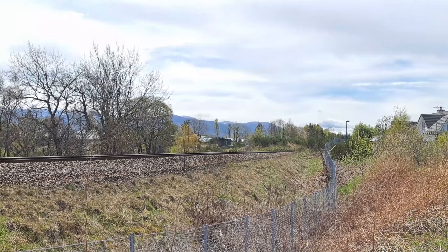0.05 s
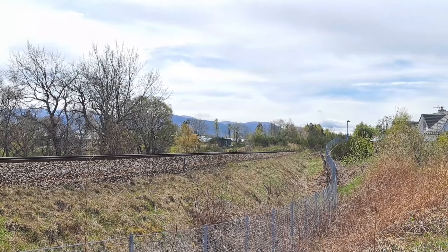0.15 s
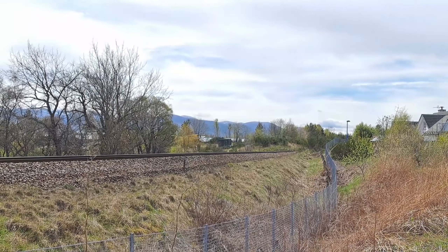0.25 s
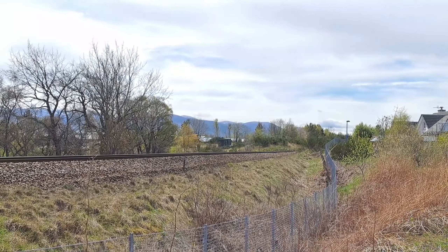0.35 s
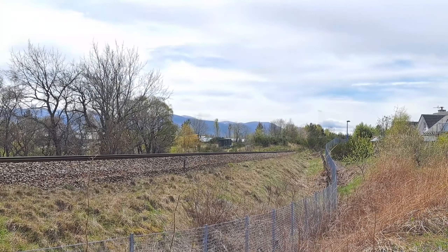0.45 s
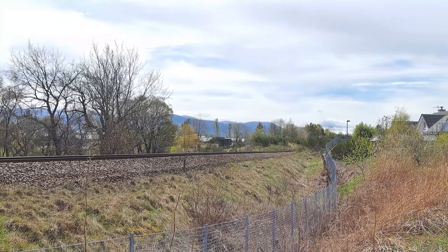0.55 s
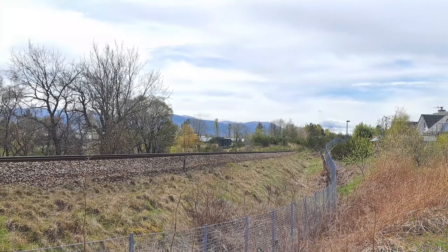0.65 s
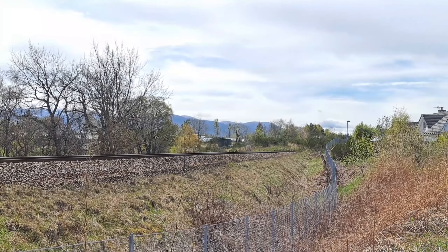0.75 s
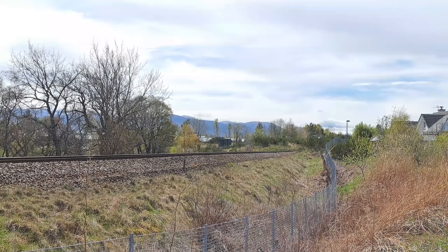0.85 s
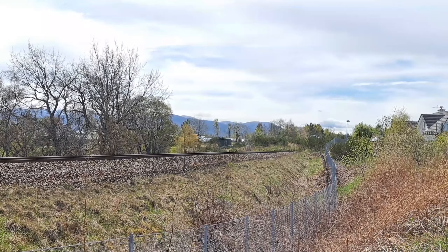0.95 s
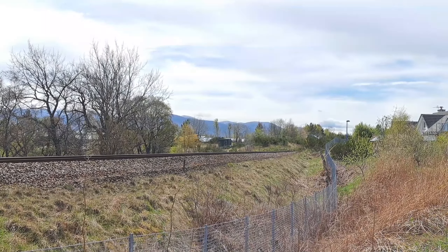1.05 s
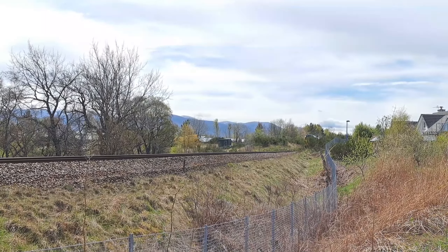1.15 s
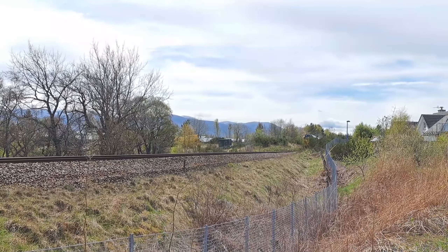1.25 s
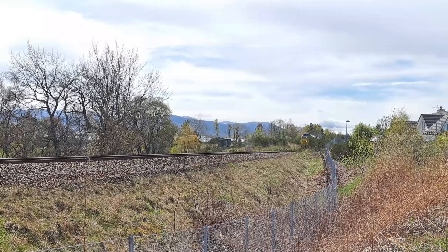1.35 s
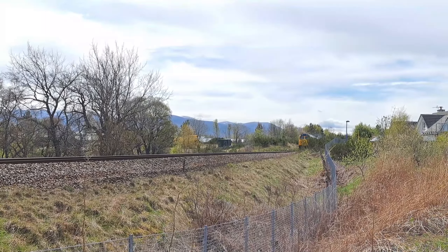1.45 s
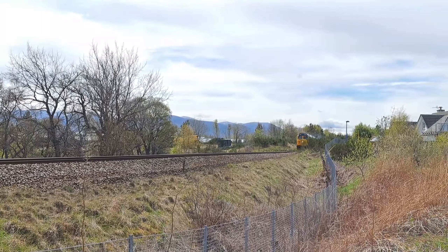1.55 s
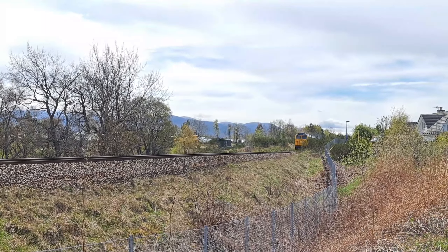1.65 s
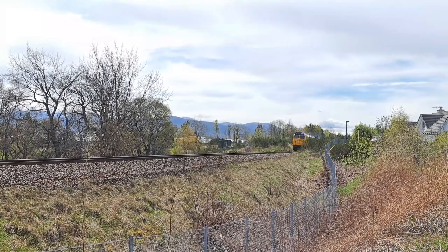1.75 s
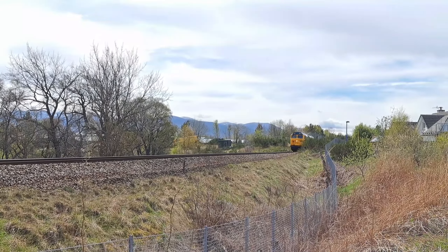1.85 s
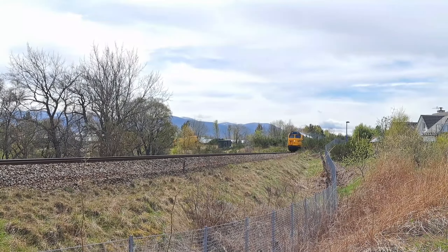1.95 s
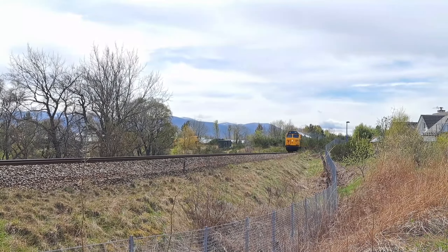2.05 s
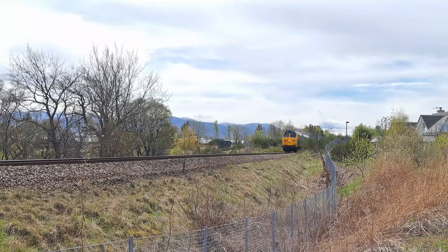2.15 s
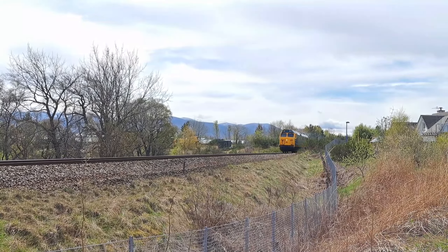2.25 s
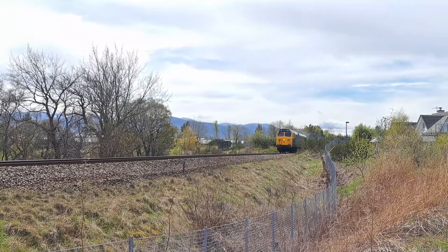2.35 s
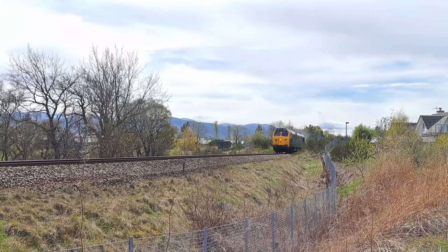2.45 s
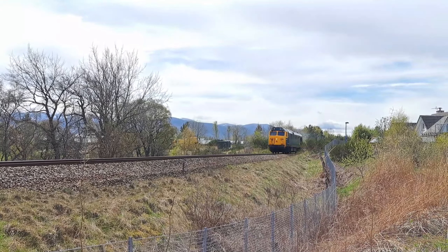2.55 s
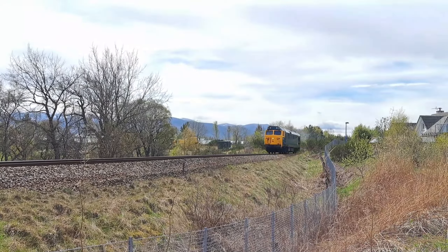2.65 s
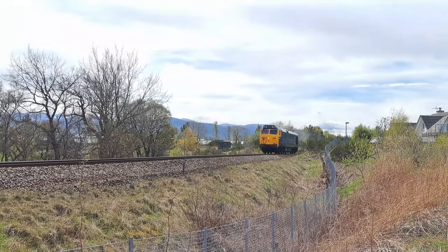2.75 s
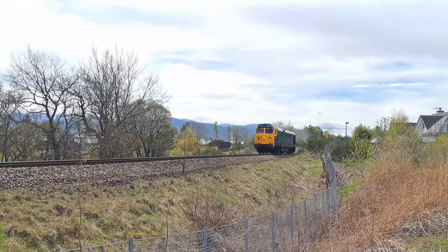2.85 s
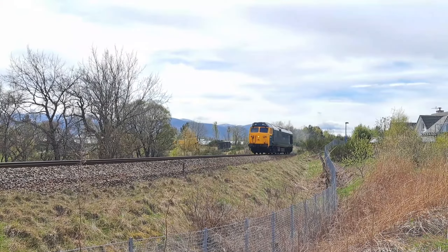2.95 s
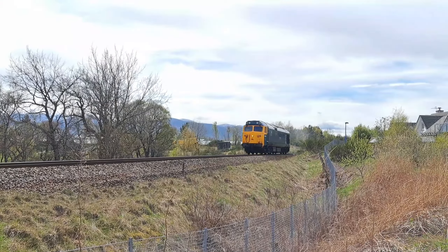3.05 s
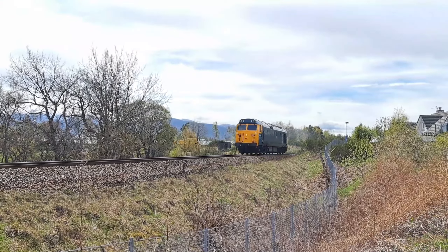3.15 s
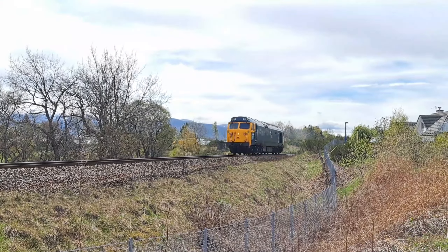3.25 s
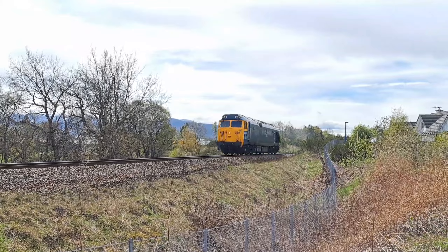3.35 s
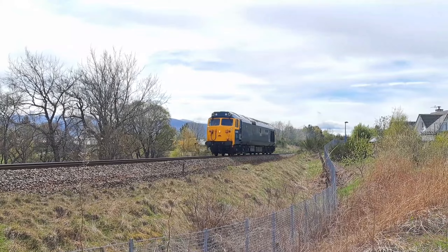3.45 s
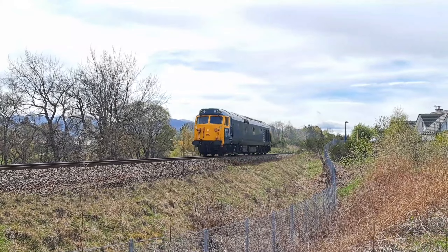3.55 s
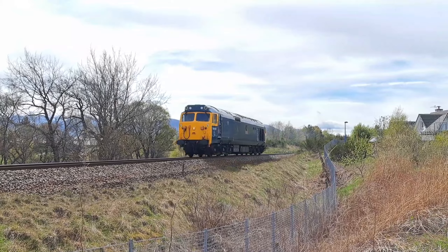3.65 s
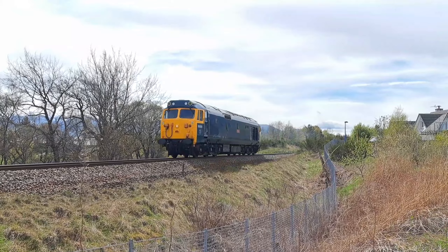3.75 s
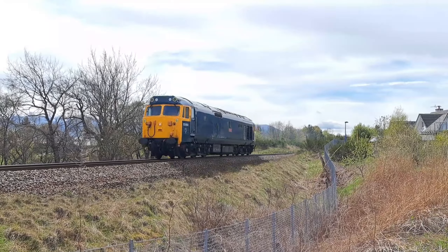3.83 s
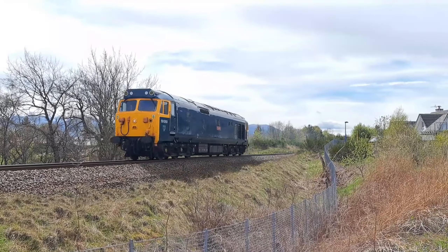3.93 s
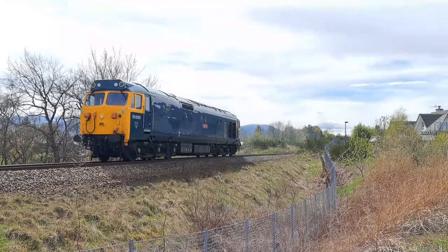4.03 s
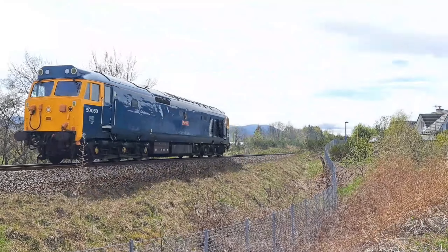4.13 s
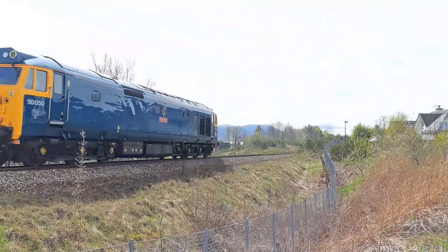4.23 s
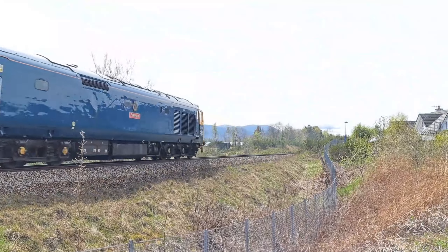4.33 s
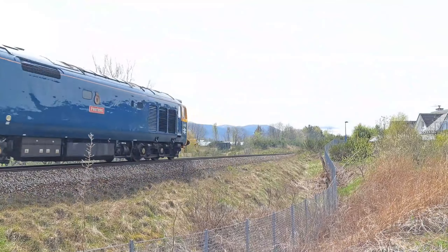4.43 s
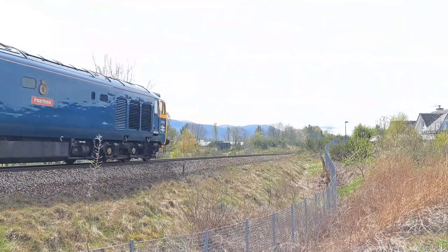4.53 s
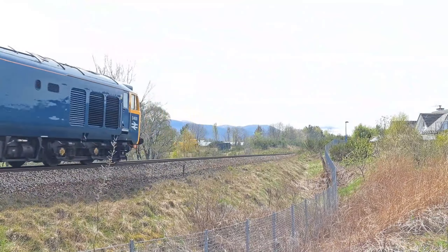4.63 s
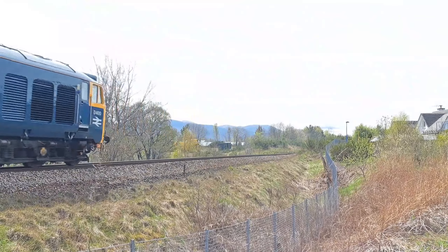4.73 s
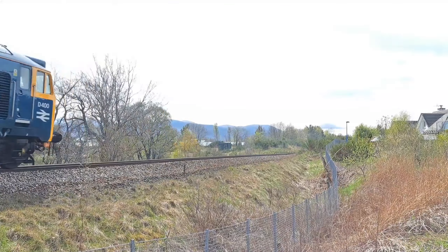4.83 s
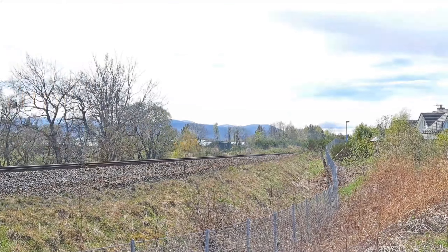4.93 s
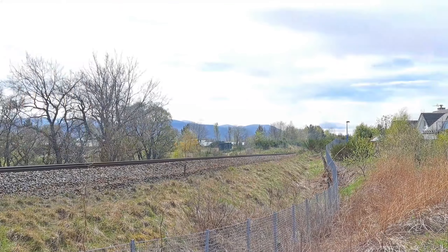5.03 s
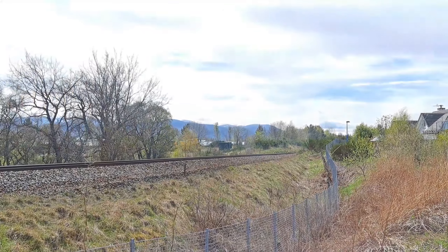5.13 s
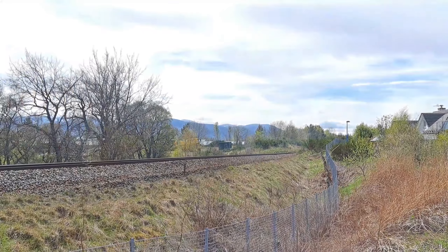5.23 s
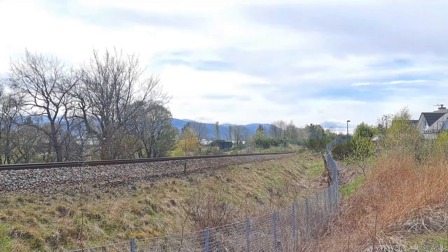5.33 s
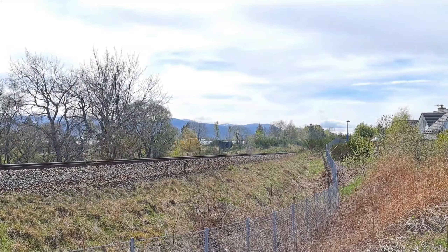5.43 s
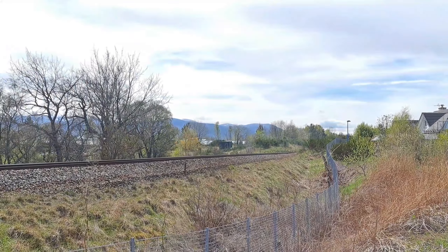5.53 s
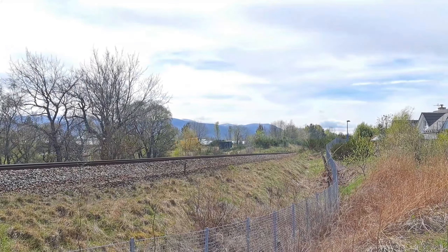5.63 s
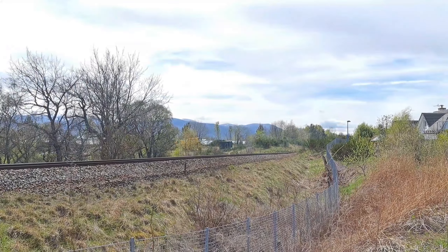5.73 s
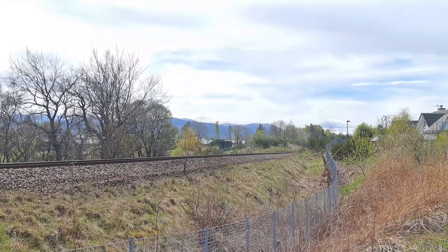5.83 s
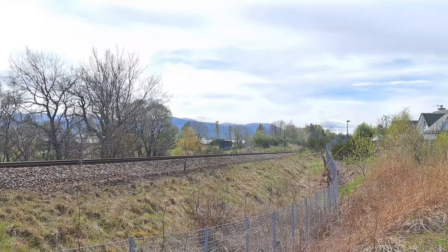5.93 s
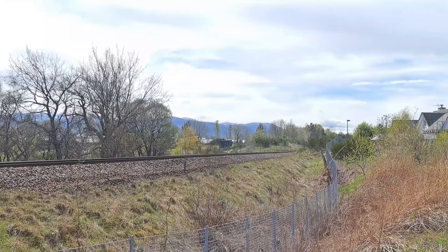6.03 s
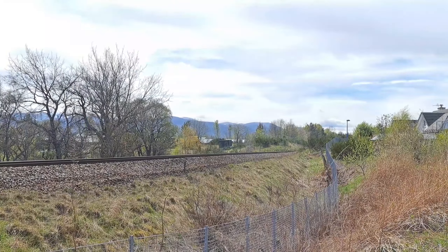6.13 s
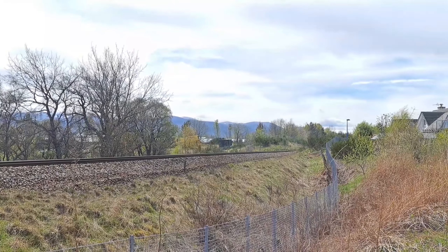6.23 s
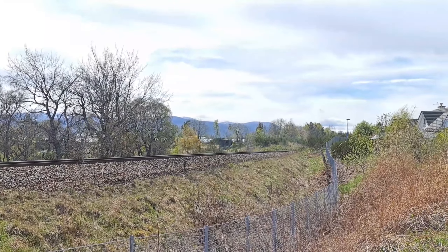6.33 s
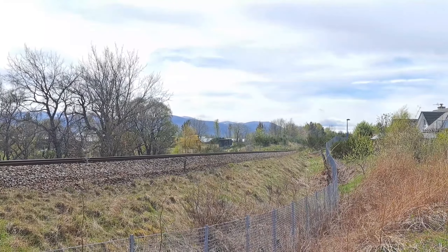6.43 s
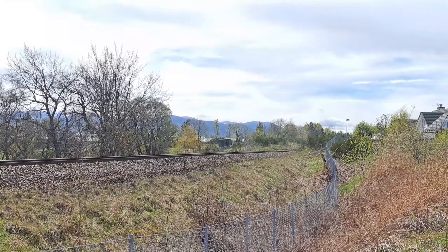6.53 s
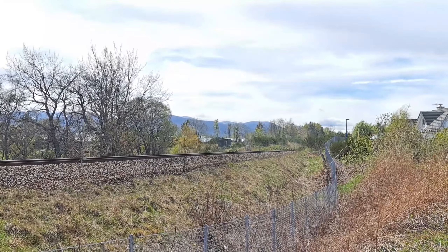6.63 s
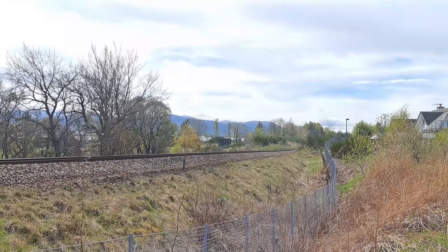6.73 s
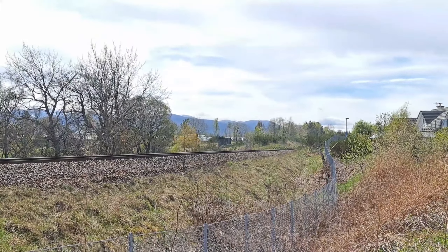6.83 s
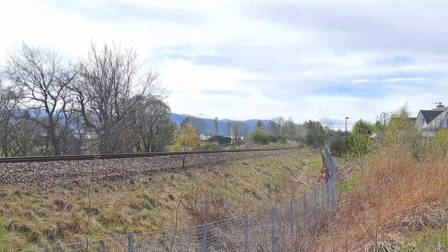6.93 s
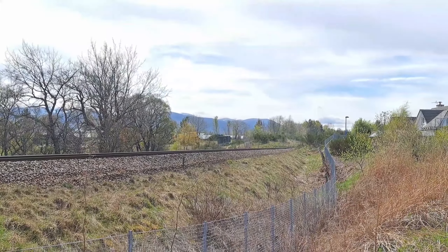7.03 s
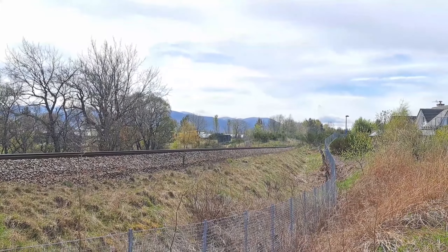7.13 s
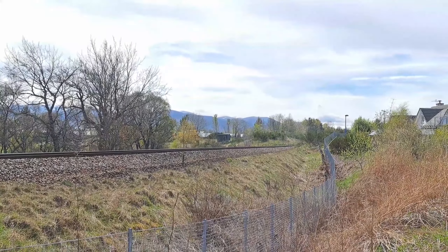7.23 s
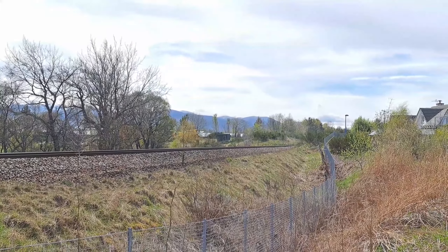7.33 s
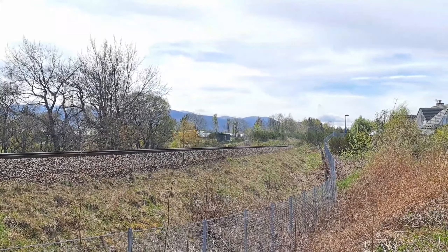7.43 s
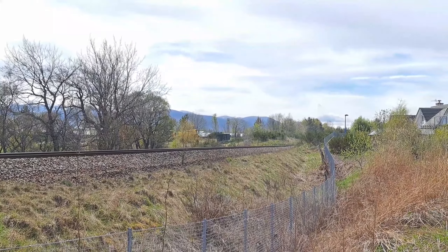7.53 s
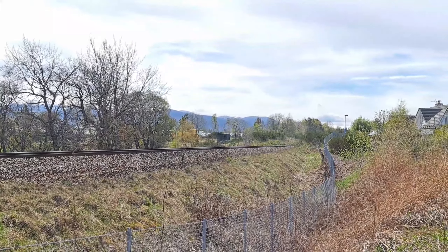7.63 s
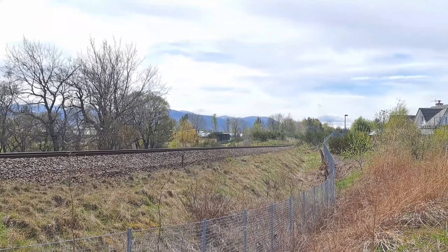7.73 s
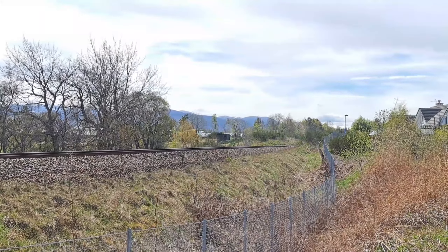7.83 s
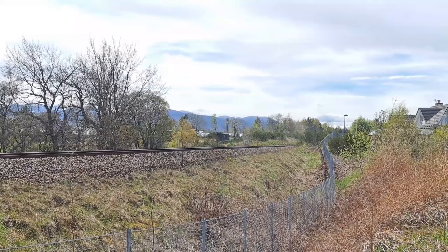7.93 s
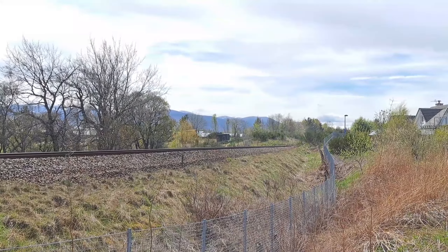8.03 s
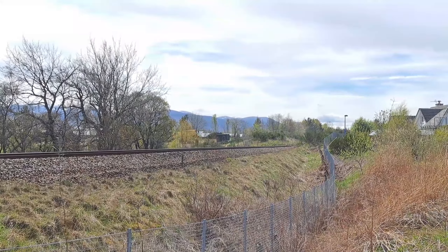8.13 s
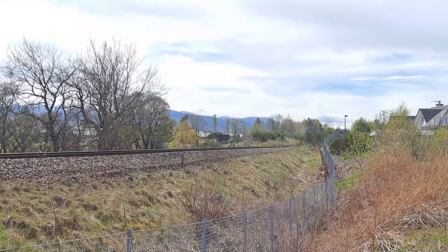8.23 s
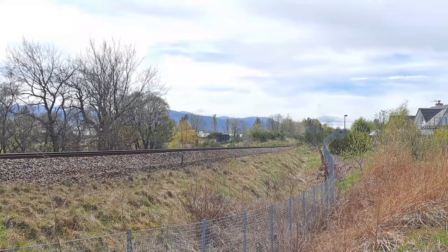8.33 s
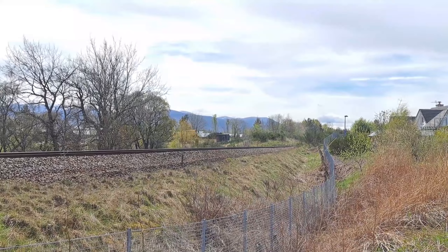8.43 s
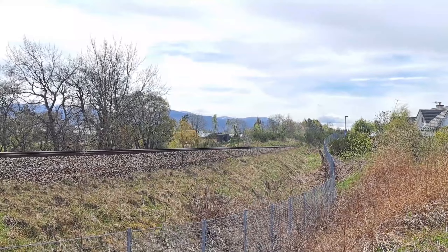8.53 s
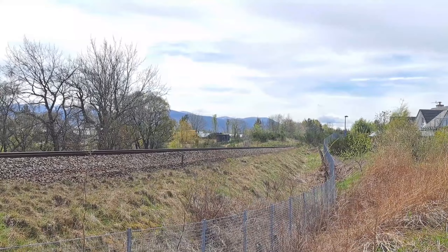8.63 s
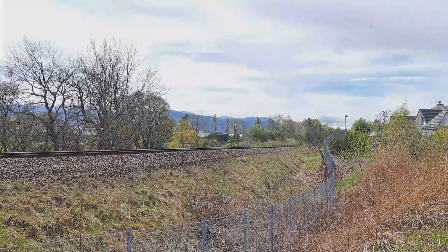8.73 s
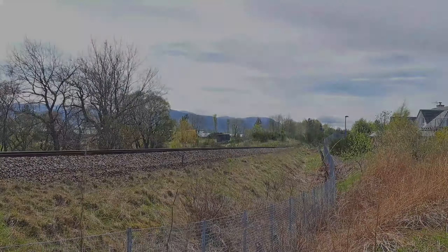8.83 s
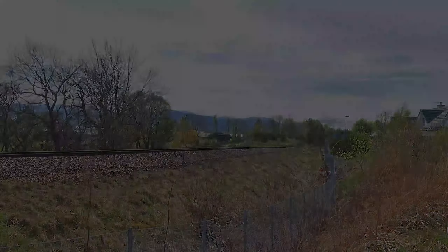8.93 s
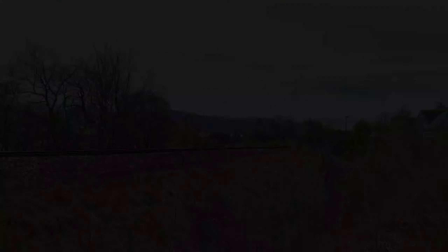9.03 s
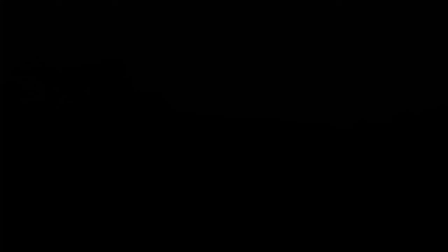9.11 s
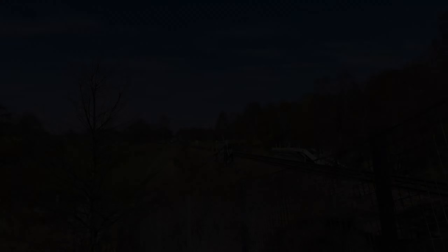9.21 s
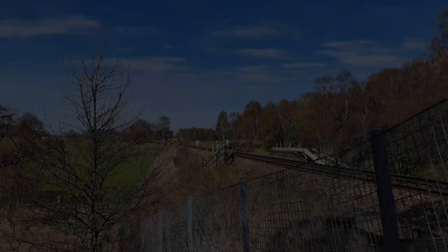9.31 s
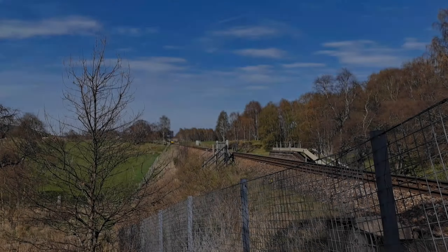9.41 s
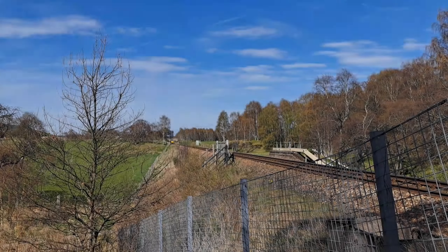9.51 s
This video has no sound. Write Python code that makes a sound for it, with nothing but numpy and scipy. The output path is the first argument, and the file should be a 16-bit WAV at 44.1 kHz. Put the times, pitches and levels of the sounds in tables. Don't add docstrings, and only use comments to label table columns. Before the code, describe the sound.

Open field beside a railway, handheld stereo phone. From 0 to 1 s, low wind puffs buffet mainly the left side over a distant, uneven diesel throb, easing as the engine throttles down. From 2 s wheel and gear roar builds, with scattered air spits from 2.25 s. Around 3.2-3.5 s short high flange squeals and brake grinding appear on the right. The locomotive passes at 4-5.3 s: loud deep throb, body rumble, broad roar, chopped exhaust, dense sharp air bursts and a breathy turbo whistle sliding downward. Pitch drops; by 6.5 s it is duller and receding. Rails ring thinly while gusts thump, strongest near 8.0-8.1 s, and continue to 9.1 s, with tiny bird notes at 9.0. Everything cuts to near silence; from 9.35 s a different spot fades in with wind, rustle, faint cricket and a rising bird note at 9.55.

```python
import sys
import numpy as np
from scipy import signal
from scipy.fft import rfft, irfft, next_fast_len
from scipy.io import wavfile
from scipy.ndimage import uniform_filter1d, map_coordinates

SR = 44100
rng = np.random.default_rng(int(sys.argv[2]) if len(sys.argv) > 2 else 0)


def nominal_scale(level):
    x = np.asarray(level, float) / 20
    return 10 ** x


def put_to_file(sound):
    columns = np.atleast_2d(sound).T
    safe = np.clip(columns, -1, 1)
    whole_steps = np.round(safe * 32767)
    wavfile.write(sys.argv[1], SR, whole_steps.astype(np.int16))


N = 422017
T = np.arange(N) / SR
SIZE = next_fast_len(N)
HZ = np.maximum(np.fft.rfftfreq(SIZE, 1 / SR), 1)

# (time [s], engine cycle as heard from ahead [Hz])
ENGINE_CYCLE = [(0, 6.36), (1.5, 5.75), (2.3, 5.49), (3, 5.38), (4, 5.31), (9.2, 5.2)]
# (multiple of the cycle, level [dB])
FIRING_ORDERS = [(5, -18), (7, -10), (9, 0), (11, -1), (12, -10), (13, -6), (14, -11), (16, -9), (18, -16),
                 (20, -12), (23, -17), (27, -19)]
COMPRESSOR_HZ = 46.8
# (time [s], pitch [Hz], level [dB])
TURBO = [(3.3, 9800, -95), (3.95, 9720, -56), (4.25, 9650, -53), (4.6, 9400, -49), (5.0, 8800, -48),
         (5.2, 8400, -49), (5.35, 8250, -54), (5.65, 8030, -56), (6.0, 7950, -59), (6.25, 7920, -63),
         (6.6, 7900, -95)]
# (time [s], peak [dB], top part against the peak [dB])
VALVE_SPITS = [(2.2532, -35.5, -25), (2.298, -34, -24.5), (2.324, -41, -25), (2.5475, -42, -25),
               (2.7611, -36, -24), (2.8045, -33, -23), (2.85, -33, -15), (3.0589, -40, -24),
               (3.1682, -33.5, -22), (3.7379, -44, -29), (3.8483, -29, -35), (3.9688, -33.5, -31),
               (4.185, -31, -23), (4.2308, -27.5, -18), (4.2717, -33, -20), (4.303, -25, -21.5),
               (4.349, -27, -17), (4.372, -23, -15), (4.491, -22, -13), (4.5396, -25, -8.5),
               (4.567, -29.5, -10), (4.613, -25.5, -7.5), (4.65, -31, -8), (4.736, -24.5, -8.5),
               (4.8099, -26.5, -7), (4.8409, -24.5, -5.5), (4.8603, -30, -9.5), (4.9162, -32.5, -5),
               (4.9631, -25.5, -13), (4.993, -29, -7), (5.0629, -29, -1), (5.0958, -34, -8),
               (5.1192, -32, -8), (5.1537, -21.5, -10), (5.2, -34, -9), (5.2759, -38, -2),
               (5.3328, -38, -17), (5.3707, -25, -24), (5.3966, -23, -21), (5.448, -26, -27),
               (5.4665, -33, -18), (5.5368, -40, -21), (5.5922, -31.5, -28), (5.635, -29, -29),
               (5.6919, -40, -32), (5.7094, -36, -32), (5.769, -27.5, -35), (5.816, -36, -28),
               (5.843, -37, -28), (5.9119, -33, -28), (5.94, -40, -26), (5.9923, -40, -24),
               (6.1625, -44, -33)]
# (time [s], length [s], pitch [Hz], level [dB])
SQUEALS = [(3.16, .13, 6040, -40), (3.28, .07, 6020, -42), (3.245, .045, 5210, -36),
           (3.245, .07, 4560, -34.5), (3.3, .035, 5180, -38), (3.34, .06, 4570, -35),
           (3.19, .05, 4560, -43), (3.36, .075, 5170, -42), (3.415, .06, 4570, -36),
           (3.51, .055, 5170, -40), (3.46, .07, 4540, -43), (5.71, .025, 2370, -35),
           (5.905, .025, 2230, -37), (5.93, .028, 2620, -39)]
# (time [s], half length [s], level [dB])
RUSTLES = [(7.098, 0.13, -67), (7.454, 0.16, -65), (8.693, 0.45, -75)]

# (pitch [Hz], width [Hz], level [dB])
RAIL_MODES_BEHIND = [(734, 57, 2), (1070, 80, -14), (1505, 115, 2.5), (1977, 190, -7), (2640, 38, -10),
                     (2940, 35, -8), (3400, 33, -11.5), (3900, 59, -5)]
RAIL_MODES_AHEAD = [(736, 50, 2.5), (834, 60, 10), (1422, 98, 6), (1940, 130, -6), (2610, 100, -25.5),
                    (4010, 300, -6.5)]
# (time [s], level [dB])
RAILS_BEHIND = [(5.0, -75), (6.2, -52), (6.9, -53), (7.08, -43), (7.8, -45), (8.1, -52), (8.3, -51),
                (8.5, -56), (8.75, -48), (9.1, -48)]

# (abreast [s], level there [dB],
# distance there [m], drop per tenfold distance ahead [dB], same behind [dB])
THROB_PASS = (5, -19, 10.5, 13, 11)
BODY_PASS = (4.5, -19.5, 11.5, 22, 35)
REAR_BODY_PASS = (5.17, -22, 5, 22, 60)
ROAR_PASS = (4.5, -20.5, 20, 17, 24)
GEAR_PASS = (4.5, -26, 19, 17, 32.5)
REAR_GEAR_PASS = (5, -25, 12, 32.5, 41.5)
GRIND_PASS = (3.32, -39, 4, 36, 22)
EXHAUST_PASS = (5, -34, 19.5, 36.5, 48.5)
HISS_PASS = (5.0, -48.5, 7, 17.5, 24)
RAILS_AHEAD_PASS = (4, -35, 24.5, 14.5, 128.5)
RAILS_HIGH_PASS = (8, -59.5, 31, 87, 22)
SPEED_M_S, ENGINE_ABREAST_S, TRACK_M = 26, 5.1, 14.5
# (time [s], level [dB])
AIR_CARRY = [(0, 0.5), (.8, -1), (2.3, -0.5), (2.9, 3), (3.1, 2), (3.4, 2), (4.1, 1.5), (5.2, -2),
             (5.65, -4.5), (6.33, -9.5), (6.6, -6.5), (7.05, 0.5), (7.75, 2), (8.1, -0.5), (8.3, -3),
             (8.5, -3), (8.8, 0), (9.1, -2)]
# (time [s], share of roar heard from behind [0-1])
BEHIND_SHARE = [(0, 0.01), (4.55, 0.05), (4.75, 0.9), (6.3, 0.88), (6.9, 0.85)]

# (pitch [Hz], level [dB per Hz])
THROB = [(20, -29.5), (32, -17), (50, 1), (75, -5), (100, -24)]
BODY = [(60, -29), (90, -12.5), (130, 1.5), (170, -6), (250, -7.5), (330, -10.5), (500, -24)]
ROAR = [(330, -18.5), (450, -8.5), (600, -3), (830, 0.5), (950, -4.5), (1200, -4), (1500, -14)]
ROAR_BEHIND = [(260, -9.5), (380, -8), (480, -1), (600, -1), (800, -4), (1000, -5), (1250, -21.5)]
GEARS = [(1000, -12), (1250, -5), (1550, 0), (1900, -2.5), (2600, -6.5), (3300, -7.5), (4200, -12.5),
         (5200, -19), (6500, -38.5)]
GRIND = [(1800, -14), (2600, -1), (4500, 2.5), (6200, -5), (8000, -15), (11000, -20.5)]
EXHAUST = [(3000, -2), (4200, -6), (5500, -6.5), (7000, -7), (8000, -14.5), (10500, -20), (13000, -33)]
HISS = [(8000, -22.5), (10000, -10.5), (11200, -1.5), (12500, 1), (14000, -5.5), (15700, -8)]
SPIT = [(2600, -10.5), (3200, -3.5), (4200, -5), (5500, -5.5), (6800, -7), (7800, -18), (10500, -31)]
SPIT_TOP = [(7000, -10.5), (8200, 3.5), (9800, -0.5), (11000, -2), (12500, -5), (14000, -10),
            (15700, -10.5)]
BUFFET = [(25, -12.5), (50, -2.5), (100, -2.5), (170, -5.5), (260, -32.5)]
EDGE = [(130, -17), (220, 1.5), (350, -6.5), (550, -17), (900, -39)]
FIELD = [(300, -6.5), (700, 10), (1300, 0.5), (2200, -9), (3300, -12), (5000, -27), (8000, -29),
         (15000, -31)]

# (time [s], half length [s],
# level [dB], tearing edge [dB], left minus right [dB])
GUSTS = [(0.103, 0.067, -33.5, -12.5, 21), (0.33, 0.051, -31, -15.5, 17.5), (.49, 0.034, -34, -17, 17),
         (.6, 0.09, -41.5, -14, 19), (1.0, 0.24, -39.5, -22, 13), (5.82, 0.078, -36.5, -1.5, 15.5),
         (6.03, 0.048, -31, -9, 16.5), (6.673, 0.023, -28.5, -35, 5), (6.923, 0.2, -34, -29, 2),
         (7.906, 0.03, -35, -28, 5), (8.136, 0.011, -25, -6, 13), (7.277, 0.017, -29, -17, 23),
         (7.437, 0.046, -28, -11.5, 16), (7.61, 0.042, -31, -30, 6), (7.733, 0.027, -37, -18, 11),
         (8.015, 0.034, -20.5, -7, 7), (8.092, 0.05, -20, 0.5, 12), (8.22, 0.021, -34.5, 4.5, 25.5),
         (8.31, 0.06, -33, -15, -4), (8.484, 0.13, -39.5, -13, -5), (8.73, 0.027, -32.5, -5.5, -7),
         (8.83, 0.042, -25, -6.5, -3), (8.963, 0.047, -39, -13, -7), (9.082, 0.03, -29.5, -17, 0),
         (9.39, 0.023, -39, -11, -1), (9.415, 0.011, -37.5, -4.5, -12), (9.455, 0.019, -36, -13, -8),
               (9.5, 0.03, -27, -16, -6.5)]
BREEZE_DB, BREEZE_EDGE_DB, BREEZE_S = -36.5, -19, (6.0, 6.2, 8.2, 8.35)

# (time [s], level [dB])
SCENE_CHANGE = [(0, 0), (9.1118, 3.7), (9.1119, -150)]
# (time [s], level [dB])
LOW_RUMBLE = [(9.1, -120), (9.125, -84), (9.28, -104.5), (9.335, -100), (9.35, -78), (9.37, -120)]
# (time [s], level [dB])
MEADOW = [(9.345, -150), (9.352, -78), (9.39, -73), (9.44, -68), (9.5, -62), (9.57, -56)]
# (time [s], level [dB])
CRICKET = [(9.345, -150), (9.352, -84), (9.37, -78), (9.5, -77), (9.57, -81)]
# (time [s], length [s], start pitch [Hz], end pitch [Hz], level [dB])
BIRDS = [
    (8.987, .018, 7100, 7000, -55),
    (8.987, .016, 6600, 6150, -61),
    (9.0, .03, 4900, 4700, -66),
    (9.549, 0.033, 3130, 4480, -61),
]
HUSH_DB, HUSH_FROM_S = -97, 9.285

# (pitch [Hz], width [Hz], boost [dB])
RIGHT_CAVITY = [(818, 194, 6), (2078, 1340, 6), (2660, 830, 8), (2617, 185, 4), (5775, 1100, 9),
                (8650, 2600, -4.5)]
CAVITY_DB = sum(db / (1 + (2 * (HZ - hz) / width) ** 2) for hz, width, db in RIGHT_CAVITY)
# (time [s], delay [s])
RIGHT_LAG = [(0, .00036), (4.4, .00036), (4.75, .00044), (9.2, .00044)]
ALIKE_HZ = 1200
WRAP_HZ, GONE_BY_S = (830, 300), (4.5, 4.75)
# (time [s], treble share from plain port [0-1], left bass [dB])
WIND_GUARD = [(8.28, 0, 0), (8.3, .9, 0), (8.345, .9, 0), (8.36, .9, -25), (8.4, .9, -25), (8.43, .9, -6),
              (8.46, .9, -22), (8.56, .9, -20), (8.6, .9, 0)]
# (pitch [Hz], threshold against the neighbourhood [dB])
TREBLE_LOSS = [(2500, -30), (4000, -17), (6500, -12), (8000, -2), (10500, -2), (13000, -7), (14500, -2),
               (15300, 1), (15800, 5)]


def curves(table):
    s, *columns = np.transpose(table)
    return [np.interp(T, s, c) for c in columns]


def pan(db):
    return nominal_scale(np.array([db, -db]).reshape(2, -1) / 2)


def walk(rate):
    k = int(SR / rate)
    held = np.repeat(rng.standard_normal(N // k + 1), k)
    x = uniform_filter1d(uniform_filter1d(held, k), k)[:N]
    return x / x.std()


def colour(points):
    hz, db = np.transpose(points)
    return nominal_scale(np.interp(np.log(HZ), np.log(hz), db, left=-200, right=-200))


def ports(gain, alike=0.86, flicker_db=2.0, rate=10, count=3):
    first, other = rfft(rng.standard_normal((2, SIZE)))
    share = np.clip(alike, 0, 1) / (1 + (HZ / ALIKE_HZ) ** 2) ** 0.55
    second = nominal_scale(CAVITY_DB) * (share * first + np.sqrt(1 - share ** 2) * other)
    pair = gain * np.array([first, second])
    place = np.cumsum(gain ** 2) / np.sum(gain ** 2) * (count - 1)
    out = 0
    for k in range(count):
        band = irfft(pair * np.clip(1 - abs(place - k), 0, 1), SIZE)[:, :N]
        out = out + band * nominal_scale(flicker_db * walk(rate))
    return out / out.mean(0).std()


def passing(part, carry=1):
    abreast_s, db, range_m, ahead_db, behind_db = part
    far = np.log10(np.hypot(SPEED_M_S * (T - abreast_s), range_m) / range_m)
    return db - np.where(T < abreast_s, ahead_db, behind_db) * far + carry * curves(AIR_CARRY)[0]


def engine(turn, shift):
    orders = 0
    for (k, db), start in zip(FIRING_ORDERS, rng.uniform(0, 2 * np.pi, len(FIRING_ORDERS))):
        orders = orders + nominal_scale(db + 1.5 * walk(2)) * np.sin(k * turn + start + .25 * walk(3))
    drone_hz = COMPRESSOR_HZ * shift * (1 + .012 * walk(2.0))
    drone = nominal_scale(2.6 * walk(1.8)) * np.sin(2 * np.pi * np.cumsum(drone_hz) / SR)
    tones = orders * nominal_scale(-4) + drone * nominal_scale(-4)
    heard = np.interp(T, [4.6, 5.5], [1, .35])
    churn = nominal_scale(-7 + 5 * np.exp(-T / 1.8)) * ports(colour(THROB), alike=.8, count=2)
    throb_db = passing(THROB_PASS, carry=0.79) + 3.6 * np.exp(-T / 2.7)
    throb_db = throb_db - 12.0 * curves(WIND_GUARD)[0] + 0.72 * walk(3.7)
    lost_db = np.interp(T, [6.05, 6.15, 6.45], [0, -10, -45])
    front_body = nominal_scale(passing(BODY_PASS, carry=0.2) + lost_db)
    body_gain = np.hypot(front_body, nominal_scale(passing(REAR_BODY_PASS, carry=0)))
    body = body_gain * ports(colour(BODY), alike=0.94, flicker_db=1.6, rate=14)
    return nominal_scale(throb_db) * (heard * tones + churn) + body


def wheels():
    gear_db = passing(GEAR_PASS, carry=1.47) - 1.1 * curves(WIND_GUARD)[0]
    gear_gain = np.hypot(nominal_scale(gear_db), nominal_scale(passing(REAR_GEAR_PASS)))
    pan_db = np.interp(T, [3.4, 4.6], [1.5, -2.5])
    joint = 1.0 * walk(11)
    behind = np.clip(curves(BEHIND_SHARE)[0], 0, 1)
    roar = np.sqrt(1 - behind) * ports(colour(ROAR), alike=0.74, flicker_db=0.62)
    dull_roar = ports(colour(ROAR_BEHIND), alike=0.92, flicker_db=1.0)
    roar = roar + np.sqrt(behind) * nominal_scale(-3.5) * dull_roar
    roar = nominal_scale(passing(ROAR_PASS, carry=0.9) + 0.5 * joint) * roar
    gears = gear_gain * nominal_scale(joint) * pan(pan_db) * ports(colour(GEARS), flicker_db=1.13, count=4)
    grind_gain = nominal_scale(passing(GRIND_PASS, carry=0) + 2.4 * walk(30))
    grind = grind_gain * ports(colour(GRIND), flicker_db=-2.0)
    return roar + gears + grind


def squeals():
    out = 0
    for s, length, hz, db in SQUEALS:
        swell = np.sin(np.pi * np.clip((T - s) / length, 0, 1)) * (1 + 0.41 * walk(70))
        whistle = np.sin(2 * np.pi * hz * T + .8 * walk(200))
        out = out + nominal_scale(db - 3.5) * pan(-11.) * swell * whistle
    return out


def exhaust_chop(turn):
    puff = 8 * turn / (2 * np.pi)
    size = nominal_scale(2.4 * rng.standard_normal(N // 500))[puff.astype(int)]
    near = np.interp(T, [3.4, 4.4, 5.8, 6.4], [.08, .3, .3, .04])
    return 1 - near + near * size * 2 * np.sin(np.pi * (puff % 1)) ** 2


def valve_spits():
    upper, top = np.zeros((2, N))
    for s, db, top_db in VALVE_SPITS:
        shape = np.clip((T - s) / .003, 0, 1) * np.exp(-np.clip(T - s - .006, 0, 1) / .005)
        upper = upper + nominal_scale(db - 8) * shape
        top = top + nominal_scale(db + top_db - 6) * shape
    return upper, top


def turbocharger(drive):
    hz, db = curves(TURBO)
    whirl = []
    for _ in range(2):
        phase = 2 * np.pi * np.cumsum(hz * (1 + .004 * walk(25))) / SR
        whirl.append(walk(900) * np.sin(phase))
    return nominal_scale(db - 1 + 1.2 * walk(45)) * drive * pan(9.) * np.array(whirl)


def gas(turn):
    exhaust_gain = nominal_scale(passing(EXHAUST_PASS, carry=0.94))
    chop = exhaust_chop(turn)
    exhaust = exhaust_gain * chop * ports(colour(EXHAUST), flicker_db=1.0, count=4)
    upper, top = valve_spits()
    spits = upper * ports(colour(SPIT), flicker_db=3.2, count=2)
    spits = spits + top * ports(colour(SPIT_TOP), flicker_db=-0.2, count=2)
    grass = sum(nominal_scale(db + 2.0 * walk(9)) * np.exp(-((T - s) / half) ** 2) for s, half, db in RUSTLES)
    hiss_gain = nominal_scale(passing(HISS_PASS, carry=1.1)) * (0.42 + 0.77 * chop) + grass
    hiss = hiss_gain * ports(colour(HISS), flicker_db=-0.5)
    whirl = turbocharger(.85 + .3 * chop + .7 * upper / exhaust_gain)
    return pan(-7) * (exhaust + spits) + hiss + whirl


def rails():
    high_db = passing(RAILS_HIGH_PASS, carry=.3) - 4.5 * curves(WIND_GUARD)[0]
    groups = [(passing(RAILS_AHEAD_PASS, carry=0.16), RAIL_MODES_AHEAD),
              (curves(RAILS_BEHIND)[0], RAIL_MODES_BEHIND[:4]),
              (high_db, RAIL_MODES_BEHIND[4:])]
    out = 0
    for level_db, modes in groups:
        bands = sum(nominal_scale(db) / np.sqrt(1 + (2 * (HZ - hz) / width) ** 4) for hz, width, db in modes)
        out = out + nominal_scale(level_db + 4.5) * ports(bands, flicker_db=1.8, rate=30, count=4)
    return out


def wind():
    breeze = np.interp(T, BREEZE_S, [0, 1, 1, 0])
    low_power = np.ones((2, 1)) * breeze * nominal_scale(2 * BREEZE_DB + 2.2 * walk(11))
    edge_power = low_power * nominal_scale(2 * BREEZE_EDGE_DB)
    for s, half, db, edge_db, pan_db in GUSTS:
        puff = (nominal_scale(db) * pan(pan_db)) ** 2 * np.exp(-((T - s) / half) ** 2)
        low_power = low_power + puff
        edge_power = edge_power + puff * nominal_scale(2 * edge_db)
    low = ports(colour(BUFFET), alike=0.71, flicker_db=1.0, rate=88, count=2)
    edge = ports(colour(EDGE), alike=0.22, flicker_db=2.5, rate=70, count=2)
    gap = np.interp(T, [9.1118, 9.1119, 9.352, 9.39], [1, 0, 0, 1])
    return gap * (np.sqrt(low_power) * low + np.sqrt(edge_power) * edge)


def meadow():
    out = nominal_scale(curves(LOW_RUMBLE)[0]) * ports(colour(THROB), count=2)
    out = out + nominal_scale(curves(MEADOW)[0]) * ports(colour(FIELD))
    chirp = 1 / (1 + ((HZ - 4350) / 100) ** 4) + .45 / (1 + ((HZ - 4750) / 130) ** 4)
    out = out + nominal_scale(curves(CRICKET)[0]) * ports(chirp, flicker_db=1.5, rate=98, count=2)
    for s, length, from_hz, to_hz, db in BIRDS:
        part = np.clip((T - s) / length, 0, 1)
        hz = to_hz + (from_hz - to_hz) * (1 - part) ** 3
        out = out + nominal_scale(db) * np.sin(np.pi * part) ** 2 * np.sin(2 * np.pi * np.cumsum(hz) / SR)
    return out + nominal_scale(HUSH_DB) * (T > HUSH_FROM_S) * rng.standard_normal((2, N))


def late(right):
    delayed = map_coordinates(right, [(T - curves(RIGHT_LAG)[0]) * SR], order=3)
    early = rfft(right - delayed, SIZE)
    ahead, gone = (irfft(early / (1 + (HZ / hz) ** 6), SIZE)[:N] for hz in WRAP_HZ)
    share = np.interp(T, GONE_BY_S, [0, 1])
    return delayed + (1 - share) * ahead + share * gone


def scene():
    along = SPEED_M_S * (T - ENGINE_ABREAST_S)
    shift = 1 - SPEED_M_S / 343 * (1 + along / np.hypot(along, TRACK_M))
    turn = 2 * np.pi * np.cumsum(curves(ENGINE_CYCLE)[0] * shift) / SR
    left, right = engine(turn, shift) + wheels() + squeals() + gas(turn) + rails()
    right = late(right)
    plain = curves(WIND_GUARD)[0]
    flat = irfft(rfft(right, SIZE) / nominal_scale(CAVITY_DB), SIZE)[:N]
    right = (1 - plain) * right + plain * nominal_scale(1.0) * flat
    return np.array([left, right]) * nominal_scale(curves(SCENE_CHANGE)[0]) + wind() + meadow()


def duck(left, right):
    bass = irfft(rfft(left, SIZE) / (1 + (HZ / 280) ** 4), SIZE)[:N]
    return np.array([left + (nominal_scale(curves(WIND_GUARD)[1]) - 1) * bass, right])


def thin(x):
    hz, _, z = signal.stft(x, SR, "cosine", 2048, 1024)
    power = uniform_filter1d(abs(z) ** 2, size=130, axis=1)
    around = np.sqrt(uniform_filter1d(power, size=5, axis=2))
    frames = z.shape[2]
    jumps = rng.standard_normal((1, 103, frames // 2 + 1))
    jumps = jumps.repeat(10, axis=1).repeat(2, axis=2)[:, :len(hz), :frames]
    top_hz = 15800 - 480 * rng.exponential(size=frames // 3 + 1).repeat(3)[:frames]
    step_db = np.interp(hz, *np.transpose(TREBLE_LOSS), left=-99)[:, None] + 5.4 * jumps
    kept = z * (abs(z) > around * nominal_scale(step_db)) * (hz[:, None] < top_hz)
    return signal.istft(kept, SR, "cosine", 2048, 1024)[1][:, :N]


def roll_off(x):
    return signal.sosfilt(signal.butter(12, 15730, fs=SR, output="sos"), x)


def record(dry):
    rounded = np.tanh(1.019 * duck(*dry))
    return roll_off(thin(rounded))


dry = scene()
out = record(dry)
put_to_file(out)
```